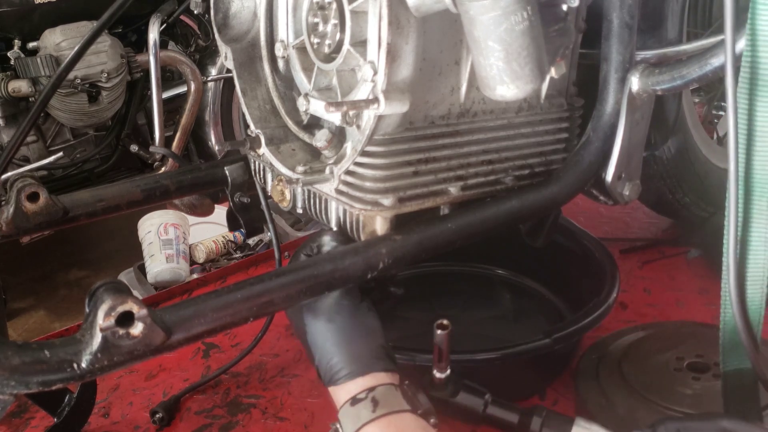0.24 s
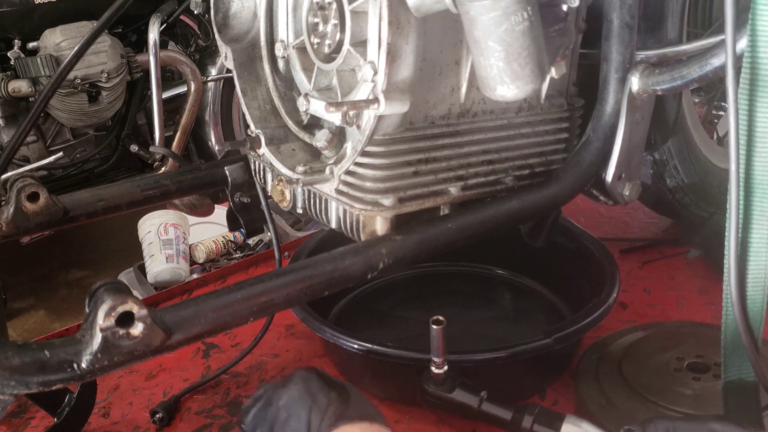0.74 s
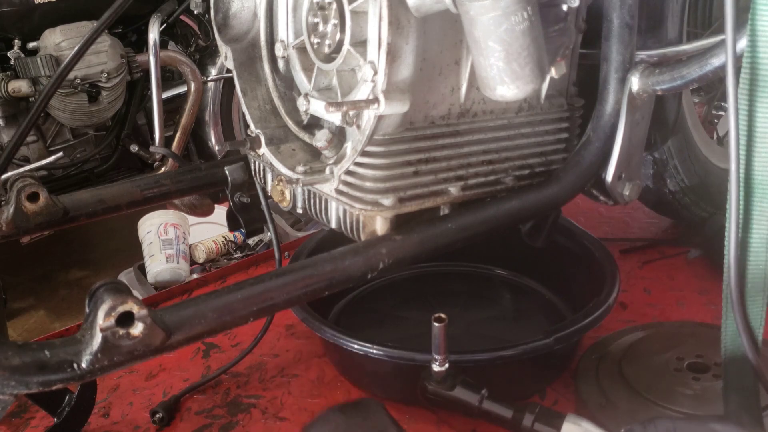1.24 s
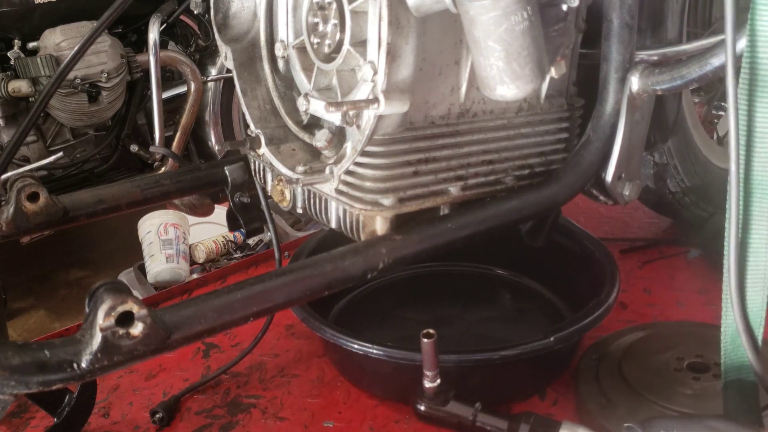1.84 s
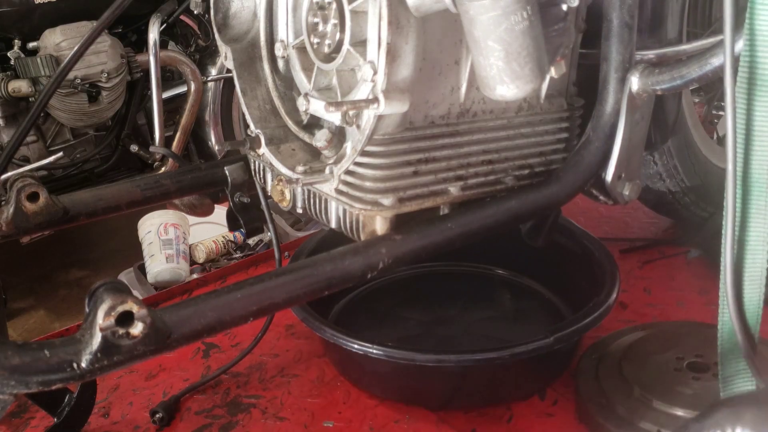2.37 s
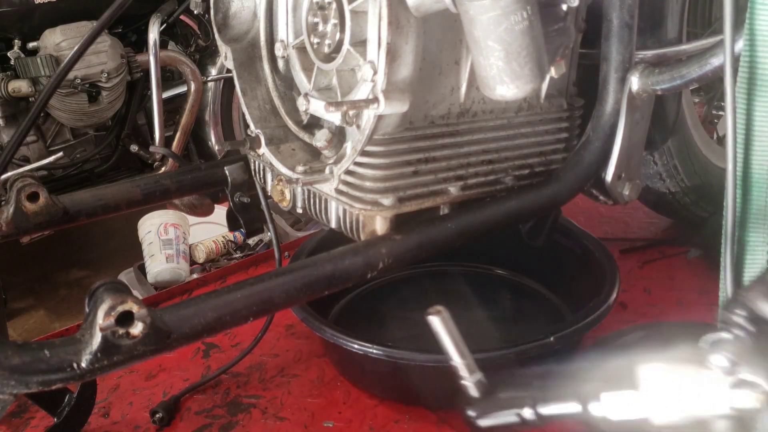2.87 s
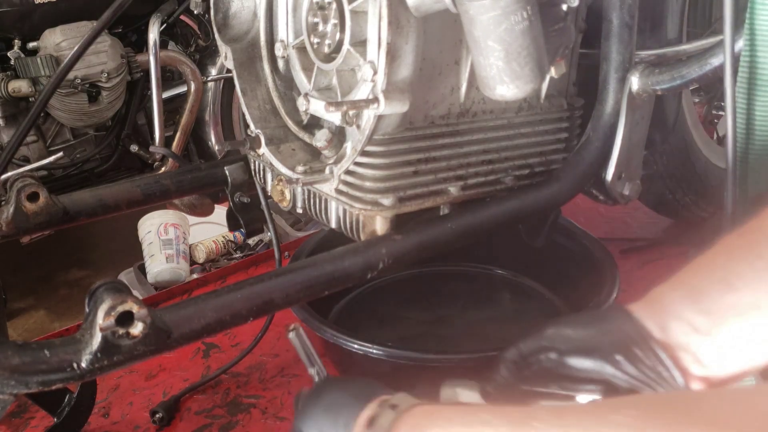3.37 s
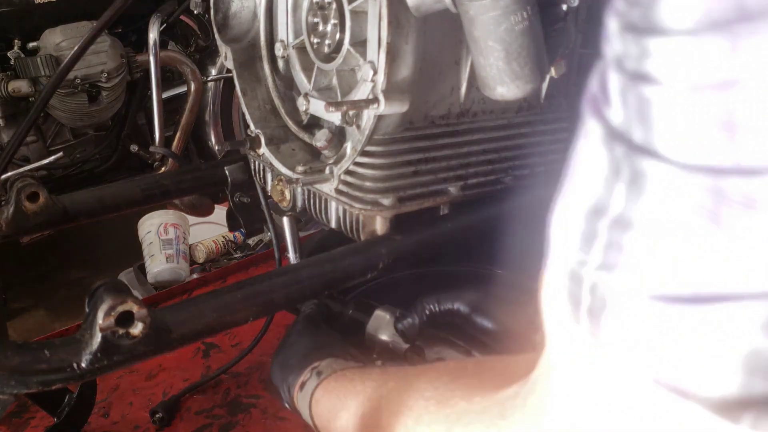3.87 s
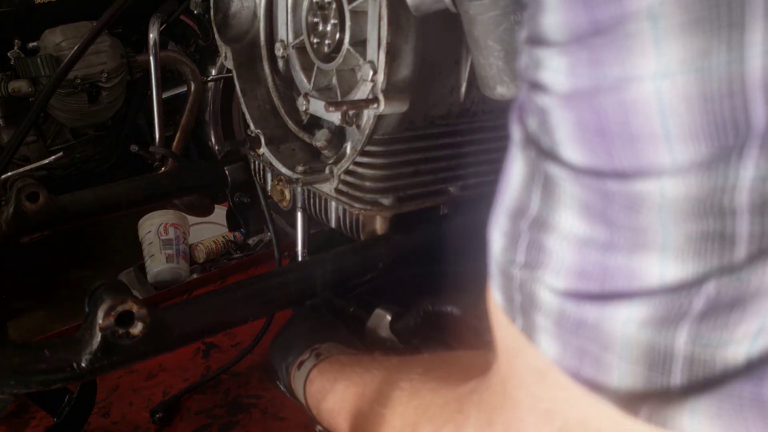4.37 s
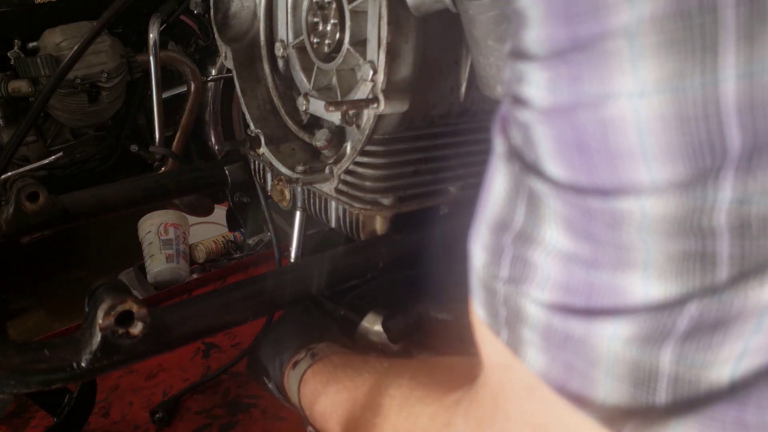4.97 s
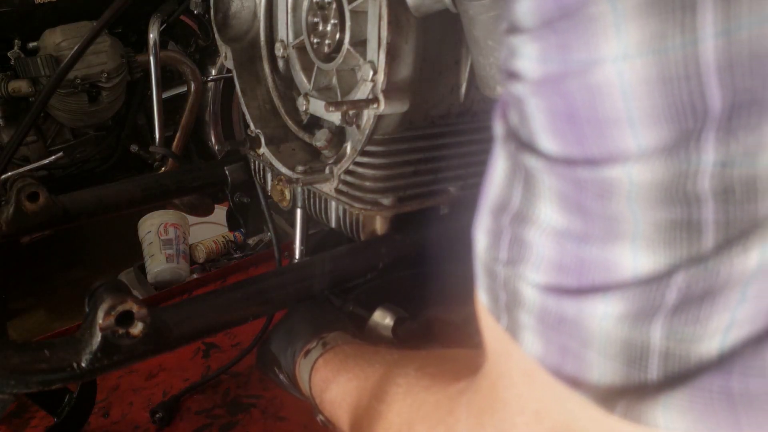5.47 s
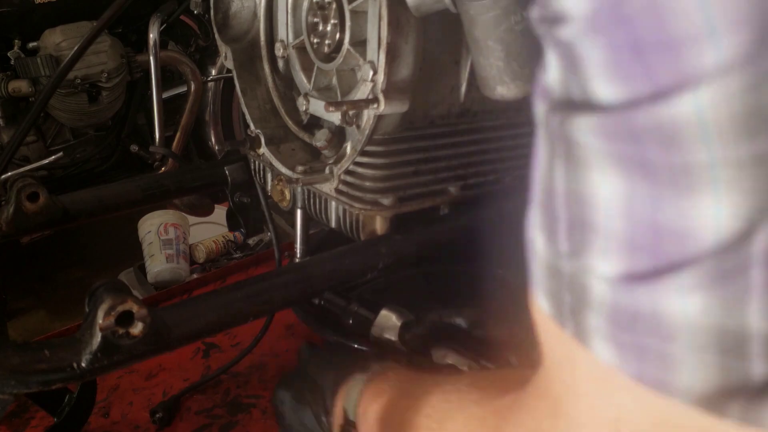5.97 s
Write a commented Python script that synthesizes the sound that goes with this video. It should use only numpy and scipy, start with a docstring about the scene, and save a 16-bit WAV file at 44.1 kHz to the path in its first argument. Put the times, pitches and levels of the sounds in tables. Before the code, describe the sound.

A very faint workshop hiss with an unsteady low hum lies underneath, rising somewhat from about 1.7 s. From 0.1 to 0.6 s come small gritty steel clicks, then a heavier clunk at 0.95. Light ticks lead into a rough tool drag on the floor at 1.3-1.6 s, ended by a very loud clack at 1.65 with a short room tail. Mostly quiet until faint clicks at 2.75 and 2.85. At 3.2 s a socket knocks and rings brightly, quickly damped. Hard, sharp snaps hit at 4.1 and 4.3, with weaker ticks up to 4.8. At 5.1 s a hollow blip opens the valve: an air ratchet spins up almost instantly, overshoots slightly and settles into a high whine near 1 kHz with harsh, distorted exhaust hiss. Around 5.55 the air rush drops, and by 5.75 the whine thins to a weak remainder continuing to the end, just over 6 s.

```python
"""Over a quiet workshop hiss and hum come small metal clicks: a bolt, a socket and an air ratchet are handled,
dragged and fitted; then the ratchet's vane motor spins up into a whine over hissing exhaust air.
Clicks are gritty noise contacts with resonances and a room tail; knocks and the socket are decaying modes.
The drag is a dense noise of slips; the ratchet is a harmonic series with noise, clipped near the microphone.
"""
import sys
import numpy as np
from scipy import signal
from scipy.fft import rfft, irfft, next_fast_len
from scipy.io import wavfile
from scipy.ndimage import uniform_filter1d

SR = 44100
rng = np.random.default_rng(int(sys.argv[2]) if len(sys.argv) > 2 else 0)


def pcm_store(signal):
    """Save signal as 16-bit PCM."""
    levels = np.round(np.clip(np.atleast_2d(signal), -1, 1) * 32767)
    wavfile.write(sys.argv[1], SR, levels.astype(np.int16).T)


N = 273861
T = np.arange(N) / SR  # time axis, s

# Spectrum of the background air: f/Hz, density level/dB (per Hz, relative)
SHOP_SPECTRUM = [(25, -11), (70, 1.5), (170, -5.5), (200, -10), (264, -1.5), (420, -5), (600, -10),
                 (800, -11), (2400, -19.5), (4400, -21), (6300, -22), (8000, -30), (10500, -27),
                 (13000, -24.5), (15000, -27)]
# Swells of the whole background: t/s, level/dB
SHOP_LEVELS = [(0.0, -70.5), (1.2, -68.5), (1.75, -55.5), (5.05, -58.5)]
# Metal contacts: t/s, nominal peak level/dB, then levels/dB against the mids of lows, low mids and highs,
# low ring f/Hz, high ring f/Hz, contact time/s, room tail level/dB
CLICK_EVENTS = [(0.0917, -25.5, -19, -4.5, -10, 2620, 3470, .007, -8),
                (0.1225, -29.5, -9, 1, -6, 2800, 4320, .006, -6),
                (0.262, -55, -20, 3, -17, 3300, 3630, .0073, -10),
                (0.4190, -27, -16, -4, -7.5, 2480, 4320, .007, -9),
                (0.5213, -28, -15, -5.5, -20, 2670, 4330, .013, -7),
                (0.5402, -19.5, -8, -.5, -9, 3330, 4400, .0051, -11),
                (0.5605, -27, -11, -.5, -2, 3000, 5080, .035, 5),
                (0.9350, -18.5, 1.5, -1.5, -27, 2230, 5530, .015, -4.5),
                (0.9544, -27, 3.5, -11, -10, 2420, 5650, .0068, 0),
                (1.1102, -39.5, -4, 1, -30, 2420, 4900, .014, 1),
                (1.2414, -38, -20, 4, -28, 2550, 5000, .01, 0),
                (1.329, -35, -20, -2, -14, 2400, 5370, .012, -2),
                (1.3556, -22, -30, 1, -12, 2400, 5370, .014, -6),
                (1.465, -32, -20, -6, -8, 2400, 5900, .008, -8),
                (1.5348, -21, -19.5, -14.5, -15, 1410, 6030, .016, -7),
                (1.633, -34.5, -10, 4.5, 7, 1480, 5900, .0084, -14),
                (1.6467, -1.5, -6.5, -13.5, -12.5, 3300, 5200, .008, -5.5),
                (1.6794, -18.5, 4, 0, -2, 1380, 5700, .018, -9),
                (1.8186, -33, 5, 6, -26, 1380, 3000, .016, -9),
                (2.744, -35.5, -15.5, -6, -8, 3070, 4870, .0041, -19),
                (2.8625, -28, -33, -9.5, -11, 3340, 3500, .0049, -8),
                (3.159, -37, -22, -5, -4, 2220, 4890, .05, -3),
                (3.2238, -13, -7, -2.5, -6, 1760, 3690, .008, 3),
                (3.5694, -52, -4, 3, -11, 2900, 5260, .013, -11),
                (3.7524, -51, -11, -8.5, -8, 1830, 4570, .012, -1),
                (3.9915, -26.5, -33.5, -3, 0, 3440, 4550, .007, -13),
                (4.0851, -9.5, -47.5, -6, -4.5, 3370, 5500, .011, -8),
                (4.1078, 0, -39.5, -13, -11.5, 3380, 5570, .0063, -17),
                (4.3107, -4.5, -13, -2.5, -19, 2170, 3800, .017, -9),
                (4.4294, -47, -19, 8.5, -11, 2290, 3330, .0094, -14),
                (4.6972, -51, -6, 5, -8, 1580, 5710, .012, -13),
                (4.7929, -31.5, -10, 4, -21, 1700, 5310, .02, -9)]
# Resonances of the steel tool: f/Hz, width/Hz, mean level/dB
STEEL_MODES = [(2190, 45, -21), (2670, 63, -0.5), (3290, 180, -4), (4205, 48, -4), (4750, 29, 0),
               (5320, 58, 5), (5733, 150, -0.5)]
# Short hollow knocks and blips, the last as the valve opens: t/s, level/dB, f/Hz, t60/s
KNOCK_EVENTS = [(0.313, -51.5, 1440, 0.26), (.335, -50, 745, 0.23), (.665, -33.5, 454, 0.079),
                (1.131, -47, 396, 0.35), (3.255, -32, 215, .2), (3.262, -33, 340, 0.32),
                (5.104, -21, 1026, 0.3)]
# The tool dragged over the floor: t/s, level/dB, level of highs/dB against it
DRAG_LEVELS = [(1.235, -55, -30), (1.32, -43, -30), (1.36, -36, -22), (1.5, -35, -22), (1.53, -42, -35),
               (1.62, -52, -35)]
# Modes of the socket: f/Hz, level/dB, t60/s
SOCKET_MODES = [(1890, -12, .32), (4600, -15, .15), (7044, 0, .27), (8640, -22, .25)]
# Harmonics of the vane rate in order: level at first/dB, droop/(dB/s), t of fall/s, level after/dB
WHINE_PARTIALS = [(-7.5, 13, 5.735, -25), (-15, 3, 5.57, -42), (-22, 40, 5.26, -34)]
# Spectrum of the exhaust air: f/Hz, density level/dB (per Hz, relative)
EXHAUST_SPECTRUM = [(200, -66), (260, -22.5), (650, -21.5), (1300, -21), (1900, -15), (2400, -19.5),
                    (3100, -11.5), (4200, -15), (6000, -14), (8000, -19.5), (10500, -13), (11500, -9),
                    (13500, -10.5)]
# Microphone colour: f/Hz, gain/dB
MIC_RESPONSE = [(170, -20), (200, -3), (6200, 0), (7100, -4.5), (8200, 2), (13300, -1), (13600, -32.5)]

HUM_HZ, HUM_DB = 212.4, -5

# clicks: heavier parts, with more lows, and harder blows sound longer
TAIL_T60_S, HEAVY_S_PER_DB, HARD_S_PER_DB = .268, .0024, .0016
RING_DB, DAMP_DB_PER_S = 7, 520  # a longer contact damps the rings

SOCKET_S, SOCKET_DB = 3.222, -10.5

VALVE_S, ROTOR_S = 5.095, 5.122  # air flows, then the rotor breaks free
# vane rate: from a crawl it shoots past its cruise, then settles
CRAWL_HZ, CRUISE_HZ, OVERSHOOT_HZ, SPIN_UP_S, SETTLE_S = 250, 1031, 74, .029, .23
CATCH_S, CATCH_HZ, CATCH_WIDTH_S = 5.23, 80, .02  # the drive takes up its load: a brief drop in rate
SPIN_UP_DB, UP_S = -5, 5.158  # the whine is weaker until the rotor nears its speed
OVERTONE_POWER = 2.5  # overtones grow with this power of the speed, per harmonic step
SWELL_S, SWELL_DB, SWELL_WIDTH_S = 6.075, 10, .03  # the third partial swells briefly
# the first rush of exhaust droops, then gives way to a steady hiss
RUSH_DB, RUSH_DROOP_DB_S, RUSH_END_S, STEADY_DB, FALL_S = -7.5, 10, 5.53, -25, .015
GEAR_HZ, GEAR_DB, GEAR_END_S = 1860, -31, 5.85  # a rough gear band
# headroom over the mean level: little from full speed to the end of the rush, more before and after
TIGHT_DB, LOOSE_DB, TIGHT_S = -2.5, 8, 5.17
TOP_HZ = 15650  # upper limit of the recorder


def undb(db):
    """Decibel law: level in dB to amplitude gain."""
    return 10 ** (np.asarray(db) / 20)


def unit(x):
    """Normalization: scale to rms 1."""
    return x / np.sqrt(np.mean(x ** 2))


def band(x, lo_hz, hi_hz):
    """Band limitation: a steep band-pass."""
    return signal.sosfilt(signal.butter(5, [lo_hz, hi_hz], "band", fs=SR, output="sos"), x)


def peak(x, hz, width):
    """Resonance: one mode of given bandwidth in Hz, scaled to rms 1."""
    return unit(signal.lfilter(*signal.iirpeak(hz, hz / width, SR), x))


def double_peak(x, hz, width):
    """Cascaded resonance: the same mode applied twice, for steeper skirts."""
    return peak(peak(x, hz, width), hz, width)


def shaped(x, points):
    """Linear filtering: multiply the spectrum by (Hz, dB) points joined over log frequency."""
    size = next_fast_len(len(x))
    f, db = np.transpose(points)
    hz = np.arange(size // 2 + 1) * SR / size
    gain = undb(np.interp(np.log(hz + 1), np.log(f), db))
    return irfft(rfft(x, size) * gain, size)[:len(x)]


def colour(points, lo_hz, hi_hz):
    """Coloured noise: a given spectrum, rms 1 inside the band lo-hi."""
    x = shaped(rng.standard_normal(N), points)
    return x / np.std(band(x, lo_hz, hi_hz))


def walk(rate):
    """Slow random fluctuation: values held 1 / rate s and smoothed twice; rms 1."""
    k = int(SR / rate) + 1
    held = np.repeat(rng.standard_normal(N // k + 1), k)
    return unit(uniform_filter1d(uniform_filter1d(held, k), k)[:N])


def step(s, before, after, width):
    """Smooth transition: a tanh change from one value to another about time s."""
    return before + (after - before) * (1 + np.tanh((T - s) / width)) / 2


def bump(s, width):
    """Gaussian pulse: a brief swell of height 1 at time s."""
    return np.exp(-((T - s) / width) ** 2)


def add(out, s, x):
    """Superposition: mix a sound in at time s."""
    i = int(s * SR)
    out[i:i + len(x)] += x[:N - i]


def shop():
    """Stationary noise plus a tone: background hiss with a hum wavering in pitch and level."""
    hum_phase = 2 * np.pi * np.cumsum(HUM_HZ + 4 * walk(15)) / SR
    hum = undb(HUM_DB + walk(36)) * np.sin(hum_phase)
    air = colour(SHOP_SPECTRUM, 200, 1000) * undb(walk(6))
    return undb(np.interp(T, *np.transpose(SHOP_LEVELS))) * (air + hum)


def steel(x, low_db, low_mid_db, high_db, body_db):
    """Modal excitation: a contact drives the tool's resonances unevenly; returns body and highs."""
    edges = ((330, 1400), (1400, 3200), (3200, 6800), (7000, 14000))
    low, low_mid, mid, high = (unit(band(x, *pair)) for pair in edges)
    mids = mid + undb(low_mid_db) * low_mid
    modes = 0
    for f, width, db in STEEL_MODES:
        drive = undb(db + 5 * rng.standard_normal())
        modes = modes + drive * signal.lfilter(*signal.iirpeak(f, f / width, SR), mids)
    body = mids + undb(body_db) * unit(modes) + undb(low_db) * low
    return body, undb(high_db) * (high + peak(high, 9300, 800))


def clicks():
    """Impact and reverberation: a gritty contact and a lumpy room tail, coloured by the part that rings."""
    out, t = np.zeros(N), T[:SR * 2 // 5]
    for s, db, *range_db, low_hz, high_hz, contact, tail_db in CLICK_EVENTS:
        t60 = max(TAIL_T60_S + HEAVY_S_PER_DB * range_db[0] + HARD_S_PER_DB * db, .05)
        noise, grit, wash = rng.standard_normal((3, len(t)))
        blow = (1 - np.exp(-(t / .0023) ** 2)) * np.exp(-(t / max(contact, .002)) ** 2)
        # a light touch comes just before the blow
        touch = undb(-28) * (t < .008)
        shape = np.roll(blow, SR // 200) + touch
        hit = shape * sum(steel(noise * undb(3.9 * grit), *range_db, -2))

        # the tail falls faster as it goes, and the highs die sooner
        lumps_db = 1.09 * unit(uniform_filter1d(grit, 300))
        decay = undb(tail_db - 60 * (t / t60) ** 1.22 + lumps_db)
        fade = (1 - np.exp(-(t / .0087) ** 3)) * decay
        body, highs = steel(wash, *range_db, 0)
        tail = fade * (body + highs * np.exp(-t / .067))

        rings = undb(range_db[1]) * double_peak(wash, low_hz, 300) + double_peak(noise, high_hz, 600)
        # the rings fade more slowly than the rest of the tail
        ring_shape = shape + fade * np.exp(t / .45)
        ringing = undb(RING_DB - DAMP_DB_PER_S * contact) * ring_shape * rings
        # noise peaks stand well over its mean level, hence the 13 dB
        add(out, s - .006, undb(db - 13) * (hit + tail + ringing))
    return out


def knocks():
    """Damped oscillation: a short rub sets one hollow mode going."""
    out, t = np.zeros(N), T[:SR // 2]
    for s, db, hz, t60 in KNOCK_EVENTS:
        rub = unit(band(rng.standard_normal(len(t)), .86 * hz, 1.16 * hz))
        tone = np.sin(2 * np.pi * hz * t) + .8 * rub
        onset = 1 - np.exp(-t / .0017)
        add(out, s, undb(db - 60 * t / t60) * onset * tone)
    return out


def drag():
    """Sliding friction: dense uneven slips of steel on the floor, with a hollow body resonance."""
    s, db, high_db = np.transpose(DRAG_LEVELS)
    slips = rng.standard_normal(N) * undb(2.8 * walk(110) + 1.8 * rng.standard_normal(N))
    body, highs = steel(slips, 1.5, -1.8, 0, -12.5)
    hollow = undb(-4) * double_peak(slips, 560, 500)
    sound = unit(body) + hollow + undb(np.interp(T, s, high_db)) * highs
    return undb(np.interp(T, s, db, left=-120, right=-120)) * sound


def socket():
    """Free vibration: the socket knocks on the frame and its modes ring, roughened by rattle noise."""
    out, t = np.zeros(N), T[:SR // 2]
    rattle = rng.standard_normal(len(t))
    ring = 0
    for hz, db, t60 in SOCKET_MODES:
        tone = np.sin(2 * np.pi * hz * t) + .45 * double_peak(rattle, hz, 160)
        ring = ring + undb(db - 60 * (t / t60) ** 1.22) * tone
    # a hand damps the ring soon after the blow
    grip = .35 + np.exp(-(t / .03) ** 4)
    onset = 1 - np.exp(-(t / .0022) ** 2)
    add(out, SOCKET_S, undb(SOCKET_DB) * onset * grip * ring)
    return out


def speed():
    """Rotor acceleration: vane rate in Hz, overshooting and relaxing to its cruise."""
    run = np.maximum(T - ROTOR_S, 0)
    goal = CRUISE_HZ + OVERSHOOT_HZ * np.exp(-run / SETTLE_S)
    lag = (goal - CRAWL_HZ) * np.exp(-(run / SPIN_UP_S) ** 1.7)
    return goal - lag - CATCH_HZ * bump(CATCH_S, CATCH_WIDTH_S)


def vane_whine(phase, run):
    """Siren principle: vanes chop the exhaust into harmonics of the vane rate."""
    start_db = step(ROTOR_S - .006, -50, 0, .005) + step(UP_S, SPIN_UP_DB, 0, .006)
    whine = 0
    for k, (db, droop, s, after_db) in enumerate(WHINE_PARTIALS):
        level_db = step(s, db - droop * run, after_db, FALL_S) + start_db
        if k == len(WHINE_PARTIALS) - 1:
            level_db = level_db + SWELL_DB * bump(SWELL_S, SWELL_WIDTH_S)
        waver_db = (1.1 + 1.2 * k) * walk(50)
        growth = (speed() / CRUISE_HZ) ** (k * OVERTONE_POWER)
        whine = whine + np.sqrt(2) * undb(level_db + waver_db) * growth * np.sin((k + 1) * phase)
    return whine


def exhaust(phase, run):
    """Jet noise: turbulent hiss, slightly amplitude-modulated at the vane rate."""
    level_db = step(RUSH_END_S, RUSH_DB - RUSH_DROOP_DB_S * run, STEADY_DB, FALL_S)
    chop = 1 + .094 * np.sin(phase)
    return colour(EXHAUST_SPECTRUM, 7800, 13320) * chop * undb(level_db + 1.64 * walk(30))


def overload(sound):
    """Nonlinear distortion: lopsided clipping at the microphone spills into the bass and the top."""
    mean = np.sqrt(uniform_filter1d(sound ** 2, 900) + 1e-9)
    tighten_db = step(TIGHT_S, LOOSE_DB, TIGHT_DB, .02)
    release_db = step(RUSH_END_S + .04, 0, LOOSE_DB - TIGHT_DB, .025)
    top = mean * undb(tighten_db + release_db)
    return np.clip(sound, -top, .85 * top)


def ratchet():
    """Air-driven rotation: whine, exhaust hiss and gear noise start as the valve opens."""
    run = np.maximum(T - VALVE_S, 0)
    # the rotor stumbles until it is up to speed
    unsteady = .003 + .03 * np.exp(-run / .1)
    phase = 2 * np.pi * np.cumsum(speed() * (1 + unsteady * walk(150))) / SR
    whine = vane_whine(phase, run)
    hiss = exhaust(phase, run)
    gear = peak(rng.standard_normal(N), GEAR_HZ, 47) * undb(step(GEAR_END_S, GEAR_DB, -60, .03))
    valve = np.clip(run / .025, 0, 1) ** 2
    return overload(shaped(valve * (whine + hiss + gear), MIC_RESPONSE))


def scene():
    """Superposition of the sources: one microphone feeds both channels."""
    handling = shaped(clicks() + knocks() + drag() + shop(), MIC_RESPONSE)
    return np.tile(handling + socket() + ratchet(), (2, 1))


def record(dry):
    """Saturation and band limits: full scale clips; the deepest bass and the top are cut."""
    wet = signal.sosfilt(signal.butter(2, 45, "high", fs=SR, output="sos"), np.clip(dry, -1, 1))
    return signal.sosfilt(signal.ellip(8, .2, 80, TOP_HZ, fs=SR, output="sos"), wet)


dry = scene()
out = record(dry)
pcm_store(out)
```